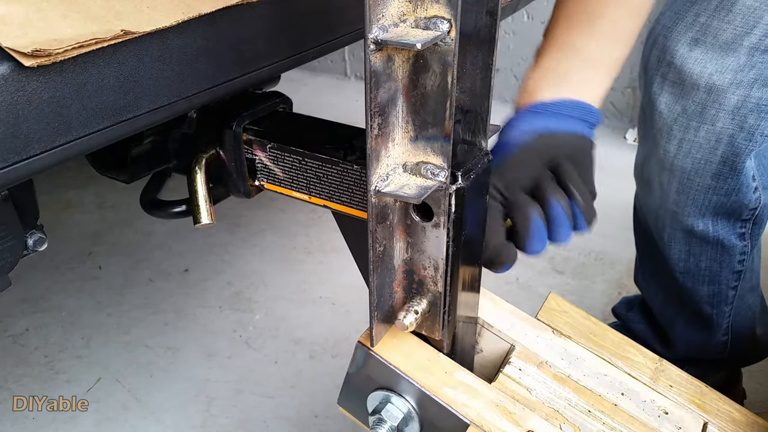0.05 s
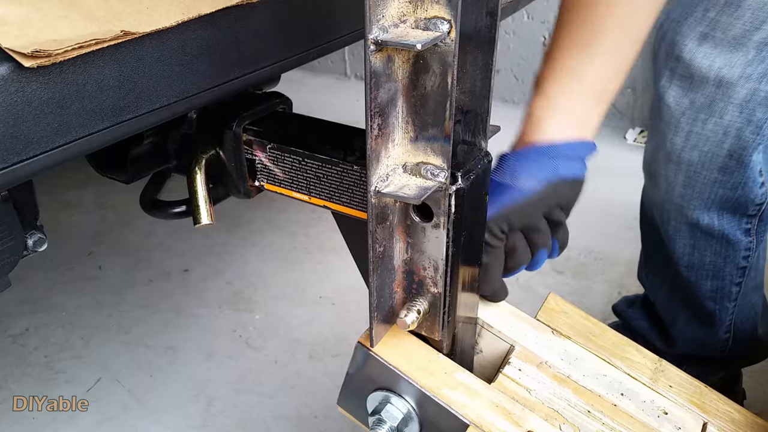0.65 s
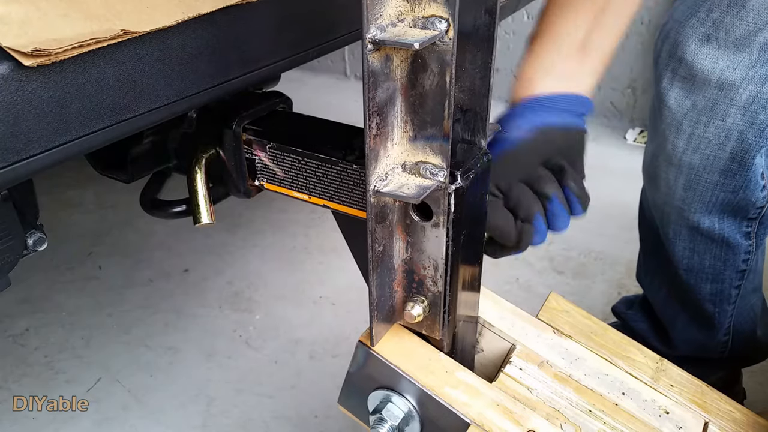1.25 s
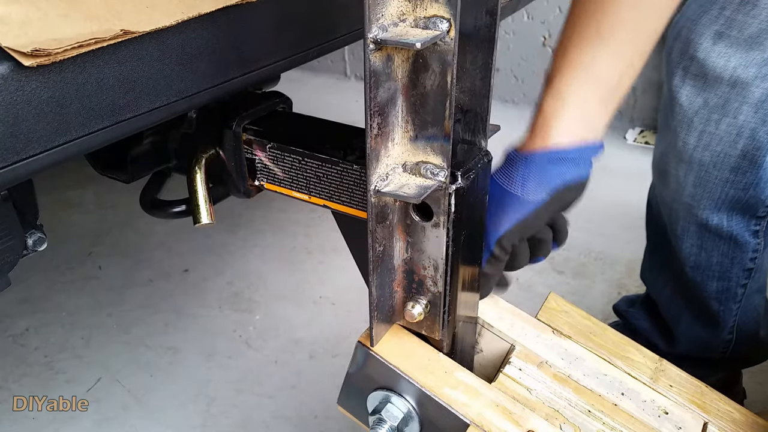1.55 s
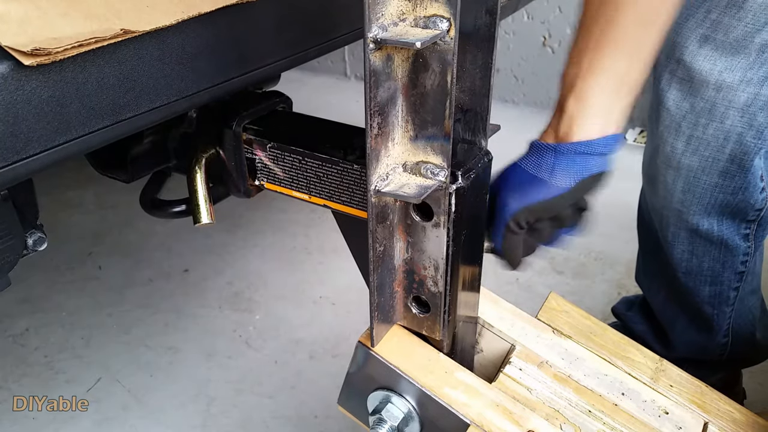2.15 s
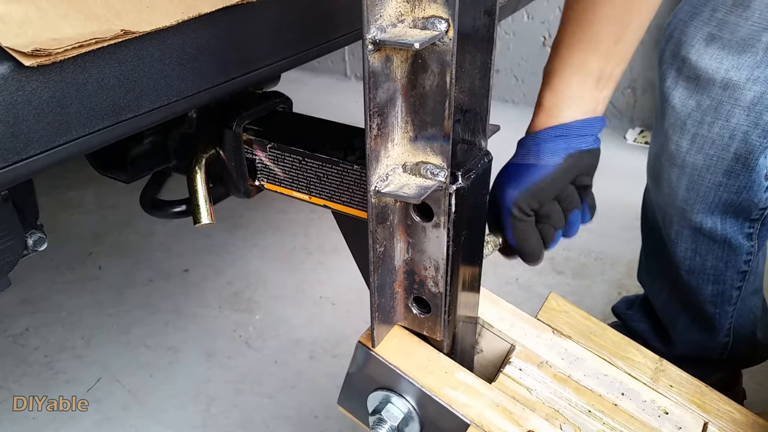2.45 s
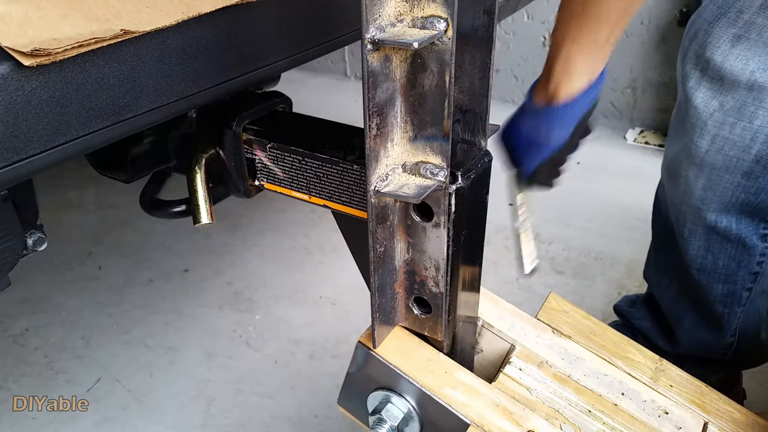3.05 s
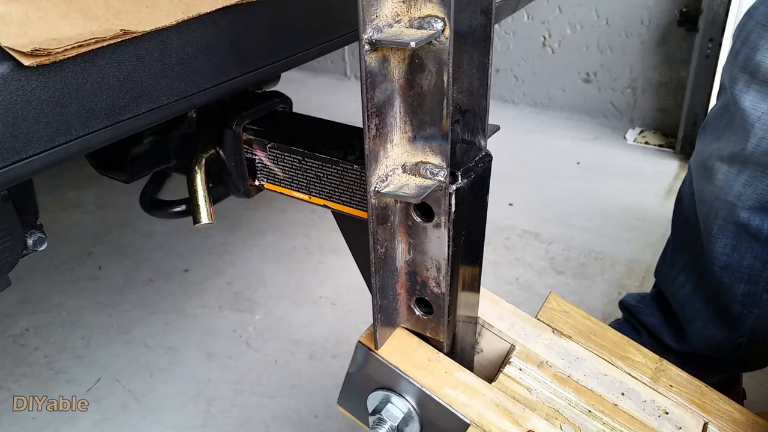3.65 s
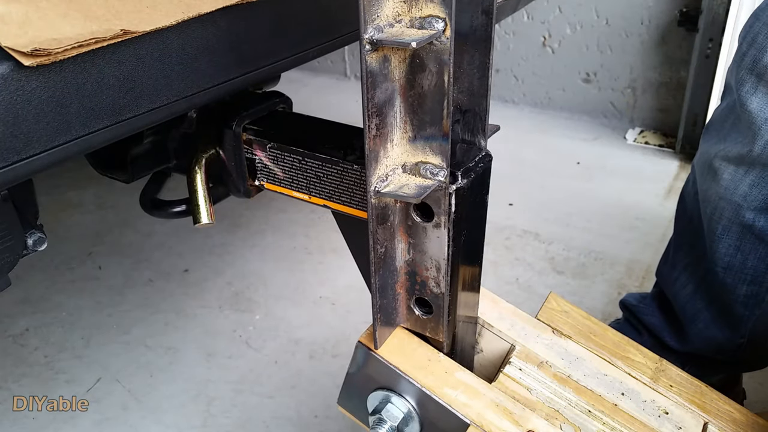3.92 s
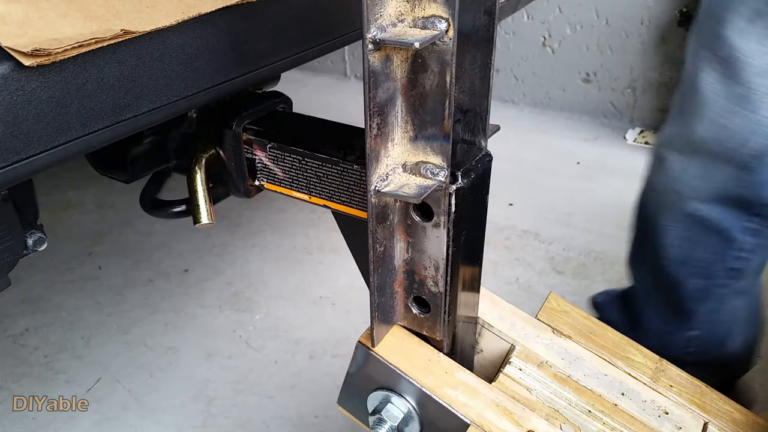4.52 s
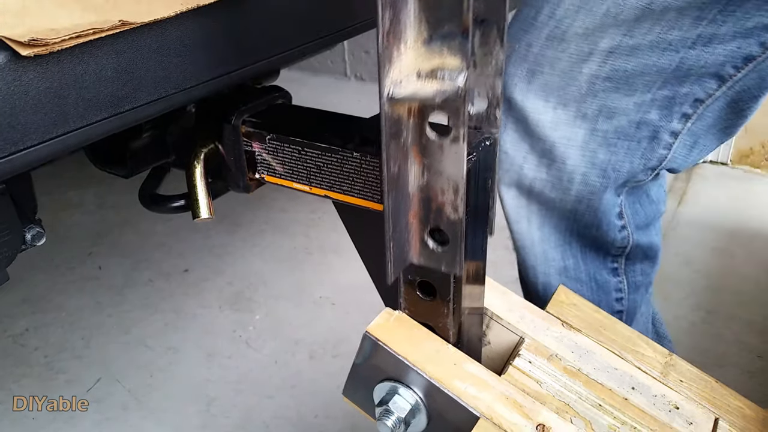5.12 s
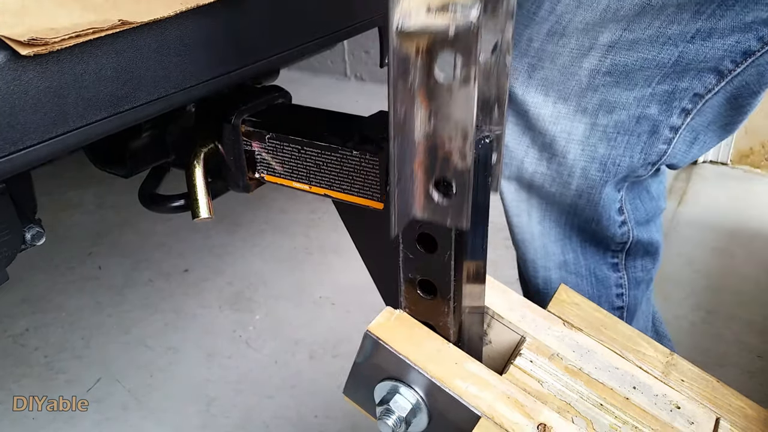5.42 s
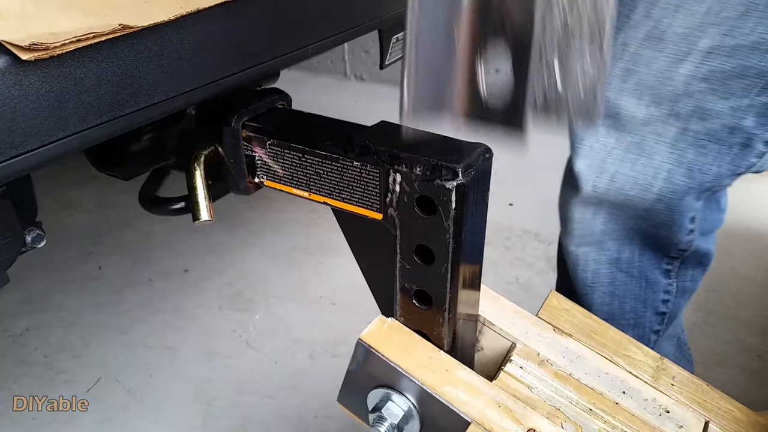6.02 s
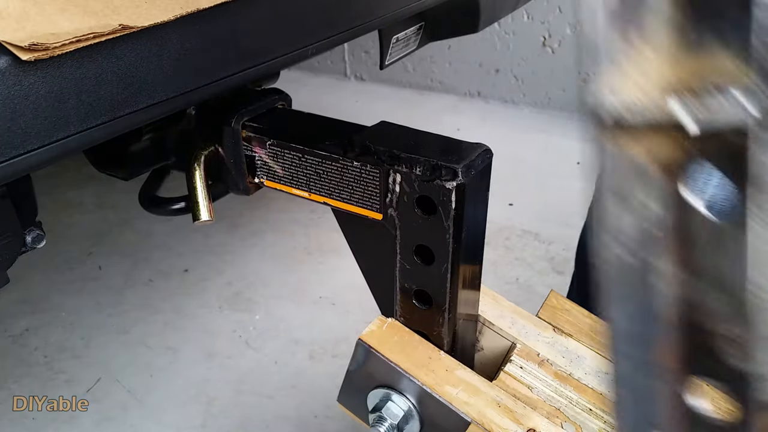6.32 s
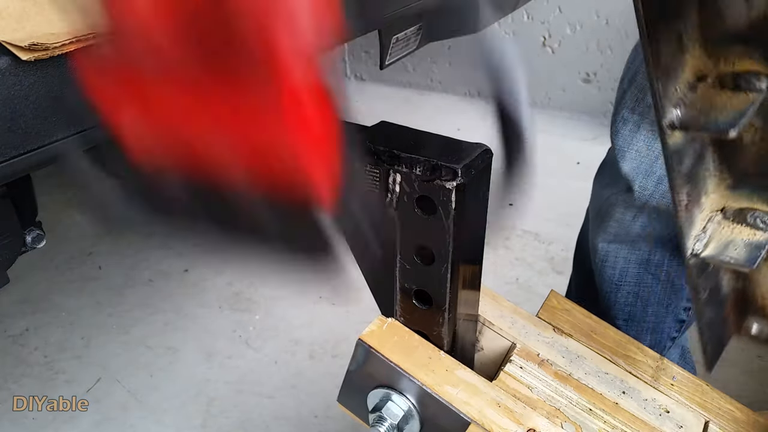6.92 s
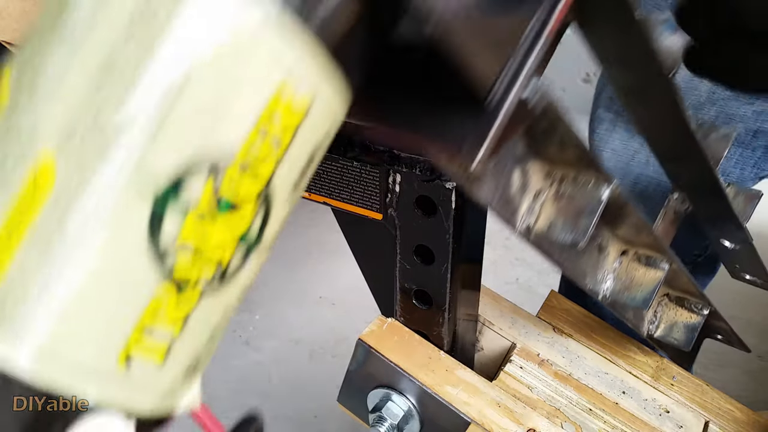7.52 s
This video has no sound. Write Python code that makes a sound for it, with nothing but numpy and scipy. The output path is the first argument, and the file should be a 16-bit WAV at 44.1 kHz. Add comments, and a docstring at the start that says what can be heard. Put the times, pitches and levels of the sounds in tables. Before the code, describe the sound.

Close up in a quiet garage, gloves and denim rustle faintly as a steel pin grinds and knocks in a mount, the knocks growing louder. The freed pin hits the concrete floor, bouncing with a high, ringing clink. Three tugs scrape a steel tube along its post, ending in a loud clatter of clanks and thumps with a short ring. A few light metal clinks follow as the tube is carried off.

```python
"""Garage, low room noise, rustling cloth. 0-3.1 s: a gloved hand works a steel pin out of a square tube
on a hitch mount; the pin slips and knocks in its hole, the mount thumps. 4.1-4.8 s: the dropped pin
bounces on concrete, its bending modes ring, a touch chokes them. 5.0-5.6 s: three tugs scrape the tube
up its post, stick-slip. 5.6 s: its mouth clanks over the post top; one wall mode rings on.
From 7 s: a loose steel part clinks on the tube as it is carried off."""
import sys
import numpy as np
from scipy import signal
from scipy.fft import rfft, irfft, next_fast_len
from scipy.io import wavfile
from scipy.ndimage import uniform_filter1d

SR = 44100
rng = np.random.default_rng(int(sys.argv[2]) if len(sys.argv) > 2 else 0)


def wrap_up_sound(samples):
    """Save the sound to the file named by the first command line argument, as 16-bit audio."""
    columns = np.atleast_2d(samples).T
    # keep every value between -1 and 1, then stretch to whole-number steps
    tamed = np.clip(columns, -1, 1)
    steps = np.round(tamed * 32767).astype(np.int16)
    wavfile.write(sys.argv[1], SR, steps)


N = 342678
TIME_S = np.arange(N) / SR
AGE_S = TIME_S[:SR]  # since a blow, 1 s long

# hand on pin, then on tube: t/s, hold/s, level/dB
HAND_GRIPS = [(0.0, 3.37, 0.5), (4.8, 3.6, 3)]
# glove and denim strokes: t/s, hold/s, level/dB
CLOTH_STROKES = [(0.0, 0.069, -51.5), (0.135, 0.021, -53.5), (0.625, 0.13, -62.5), (1.49, 0.086, -62.5),
                 (1.675, 0.016, -52), (3.374, 0.024, -60.5), (3.481, 0.26, -73), (6.015, 0.095, -53.5),
                 (6.17, 0.07, -60.5), (6.89, 0.15, -45.5), (7.17, 0.058, -55), (7.56, 0.32, -62.5)]
# pin slips in its hole: t/s, level/dB
PIN_SLIPS = [(0.068, -44.5), (0.137, -34.5), (1.094, -40.5), (1.798, -43), (1.984, -40.5), (2.148, -28.5),
             (2.239, -42.5), (2.736, -30.5), (3.068, -31.5)]
# pin or tube hits mount: t/s, clank/dB, thump/dB, treble/dB (edges bright, flat faces dull)
MOUNT_KNOCKS = [(0.211, -44, -41.5, -1), (0.943, -43, -44, -13), (1.085, -31.5, -47, 2.5),
                (1.153, -33, -38, -9.5), (1.314, -39, -41.5, 3), (1.425, -39, -49, -5.5),
                (1.872, -35, -40.5, -7.5), (1.933, -36.5, -35, 5.5), (2.049, -32.5, -29.5, -2),
                (2.09, -32, -32, 4.5), (2.303, -29.5, -25.5, 0), (2.477, -28.5, -42, 3.5),
                (2.5, -17.5, -24, -0.5), (2.515, -16.5, -26.5, -1), (2.878, -15.5, -24, 0),
                (3.109, -16.5, -39, 0.5), (4.735, -36, -32, -5), (4.793, -45, -36, 5.5),
                (4.855, -45, -30, 4.5), (5.122, -38.5, -34, 2), (5.272, -18, -22, -23),
                (5.454, -32.5, -20.5, -9), (6.169, -35, -46, -1), (7.563, -42, -32.5, 8)]
# pin hits floor: t/s, thud/dB, ring/dB, favoured f/Hz, its boost/dB
PIN_BOUNCES = [(4.064, -25, -33.5, 4000, 5.5), (4.257, -31, -43, 6740, 24.5), (4.356, -27.5, -32, 7900, 12),
               (4.46, -38.5, -48, 10900, 16)]
# tube drawn up post: t/s, hold/s, speed/dB, side pressure/dB
TUBE_TUGS = [(5.019, 0.054, -0.5, -1.5), (5.246, 0.012, -12, -5), (5.437, 0.155, -7, -6)]
# tube end hits post: t/s, clank/dB, thump/dB, favoured f/Hz
TUBE_CLANKS = [(5.594, -11, -20, 1860), (5.616, -12.5, -28, 1260), (5.63, -11, -14, 1780),
               (5.655, -44, -11.5, 1660), (5.677, -39, -9.5, 980), (5.699, -17, -20, 1510),
               (5.722, -26.5, -24, 1200), (5.744, -51, -19.5, 1900)]
# loose steel taps: t/s, ring/dB, tick/dB, tick centre f/Hz
STEEL_CLINKS = [(3.62, -80, -54, 12500), (6.953, -67, -45.5, 8140), (6.976, -69, -46, 8200),
                (7.03, -47, -32.5, 2960), (7.293, -45, -57, 4000), (7.307, -29.5, -24.5, 7460),
                (7.312, -50, -30, 1700), (7.501, -57, -51.5, 2900), (7.555, -61.5, -53, 4500)]

# modes of mount, tube and carried steel: f/Hz, level/dB, base t60/s
SWAY_MODES = [(57, -6.5, 0.21), (82.45, -6.5, 0.55), (105.4, -1, 0.35), (134.1, -0.5, 0.22),
              (178.7, -2, 0.19), (210, -10, 0.24), (260.8, -12.5, 0.28)]
MOUNT_MODES = [(357, 2.5, 0.25), (438.5, -9, 0.37), (529, 5, 0.19), (648, 2, 0.13), (710, -1.5, 0.22),
               (806.4, 2.5, 0.17), (1050, -10.5, 0.13), (1310, -30, 0.14), (1633, -1, 0.071),
               (1700, -15, 0.25), (1940, -9.5, 0.15), (2125, -2.5, 0.043), (2565, -6, 0.15),
               (3080, -16, 0.11), (3174, -15.5, 0.16), (3400, -11, 0.085), (3470, -10, 0.089)]
TUBE_MODES = [(795, -4, .35), (940, -9, .3), (1305, -3, .22), (1752, 2, .2), (1836, -4, .24),
              (1925, -5, .18), (2844, -7, .55), (3235, -14, .4), (4484, -14, .35), (5674, -20, .3),
              (6418, -13, .55), (7960, -17, .25), (8248, -13, .3), (10780, -14, .25)]
CARRIED_MODES = [(950, -13, .15), (1888, -17, .35), (2062, -12, .16), (2265, 2, .29), (2320, -11, .7),
                 (3074, -23, .3), (3682, -12, .33), (3994, -21, .25), (4242, -17, .36), (5798, -15, .2),
                 (6024, -21, .3), (6940, -16, .18), (9049, -24, .25), (11180, -13, .12)]
# pin bending modes: f/Hz
PIN_BENDING_HZ = [2766, 4421, 6674, 7563, 11138, 13560, 15680]
# per bending mode: level/dB, free t60/s, beat f/Hz, pan left/dB, lobe peak t/s, gain once fallen/dB
PIN_MODES = [(-1.5, 4.6, 9.07, 6, 4.18, -6.5), (6, 2.5, 14, 5.5, 4.21, -1), (-8, 1.4, 16.76, 6, 3.8, -3),
             (-1.5, 1.2, 19, 13, 3.9, 0), (1.5, 0.75, 34, -4, 5.6, 2.5), (-4.5, 3.7, 27, 0.5, 3.8, -25),
             (-6.5, 1.6, 39, 1, 4.37, -4.5)]
# decay of dense steel modes: f/Hz, base t60/s
DENSE_DECAY = [(100, 0.81), (400, 0.58), (800, 0.34), (2000, 0.19), (4000, 0.21), (8000, 0.12),
               (15000, 0.21)]

# noise spectra: f/Hz, level/dB
AIR_SPECTRUM = [(150, -34.5), (300, 2.5), (600, 0), (950, 5.5), (1500, -4), (2500, -17), (5000, -47),
                (15000, -40)]
RUMBLE_SPECTRUM = [(20, -20), (42, -1.5), (70, -3), (103, 6), (140, -4), (185, -7.5), (280, -16.5),
                   (600, -53)]
CLOTH_SPECTRUM = [(900, -14), (2000, -1), (4000, -7), (5600, -9), (7500, 1), (9500, -5), (12500, 1),
                  (15800, 0)]
CLANK_SPECTRUM = [(120, -3.5), (250, 4), (600, 2), (950, -2.5), (1800, -9.5), (2600, -14.5), (3450, -21),
                  (4200, -38)]
CRACK_SPECTRUM = [(1500, -12.5), (3300, -7), (4300, 5.5), (6000, -10), (7500, 14), (9200, -9), (11500, 3),
                  (15500, -21.5)]
THUD_SPECTRUM = [(90, -23), (200, 11), (500, 3.5), (1100, 6.5), (1700, -3), (4000, -9.5), (12000, -26.5)]
GRIT_SPECTRUM = [(1800, -27), (3400, 4.5), (5500, -5), (7900, 5.5), (9500, -7), (11000, 5), (13000, 3),
                 (15800, -7)]
JUDDER_SPECTRUM = [(20, -15), (42, -7), (60, -5.5), (80, -2.5), (103, 3.5), (140, -7.5), (185, -8),
                   (280, -20), (400, -11.5), (700, -54)]
TUBE_SPECTRUM = [(120, -11), (300, 1), (750, 1), (1050, -3.5), (1800, -11.5), (2400, -16.5), (3300, -18),
                 (4500, -45.5)]


def amp(db):
    """dB to gain."""
    return 10 ** (np.asarray(db) / 20)


def at_hz(hz, points):
    """Table lookup, log-frequency axis."""
    f, value = np.transpose(points)
    return np.interp(np.log(hz + 1), np.log(f), value)


def fade(t, t60_s):
    """Exponential decay, 60 dB in t60_s."""
    return np.exp(-np.log(1000) * t / t60_s)


def unit(x, size=None):
    """Scale to rms 1, overall or over the first size samples."""
    return x / np.sqrt(np.mean(x[..., :size] ** 2) + 1e-18)


def pan(x, left_db):
    """Stereo, left minus right = left_db."""
    return x * amp([[left_db / 2], [-left_db / 2]])


def add(out, at_s, x):
    """Mix x into out."""
    i = int(at_s * SR)
    out[:, i:i + x.shape[1]] += x[:, :N - i]


def stroke(at_s, hold_s, rise_db_per_s, fall_db_per_s):
    """Arm movement envelope: rise until at_s, hold, fall."""
    early_s, late_s = np.maximum(at_s - TIME_S, 0), np.maximum(TIME_S - at_s - hold_s, 0)
    return amp(-rise_db_per_s * early_s - fall_db_per_s * late_s)


def drift(rate_hz):
    """Random values joined by lines."""
    return np.interp(TIME_S * rate_hz, np.arange(200), rng.standard_normal(200))


def handling():
    """Hand activity envelope."""
    return sum(amp(db) * stroke(at_s, hold_s, 148, 27) for at_s, hold_s, db in HAND_GRIPS)


def noise(spectrum, size=SR, alike_hz=900):
    """Coloured stereo noise, sides most alike in the bass."""
    n = next_fast_len(size)
    hz = np.arange(n // 2 + 1) * SR / n
    mid, side = rfft(rng.standard_normal((2, n)))
    side = side * (hz + 0.11 * alike_hz) / (hz + alike_hz)
    bins = np.array([mid + side, mid - side]) * amp(at_hz(hz, spectrum))
    return unit(irfft(bins, n)[:, :size])


def ring(modes, stretch=1, scatter_db=2):
    """Damped modes, reweighted per blow; stereo phase spread grows with pitch."""
    out = np.zeros((2, SR))
    for (hz, db, t60_s), (weight, lag, sign) in zip(modes, rng.standard_normal((len(modes), 3))):
        t = AGE_S[:int(SR * t60_s * stretch)]
        phase = np.array([[1], [-1]]) * lag * min(0.18 + hz / 2500, 1)
        gain = np.sign(sign) * amp(db + scatter_db * weight)
        out[:, :len(t)] += gain * fade(t, t60_s * stretch) * np.sin(2 * np.pi * hz * t + phase)
    return unit(out, size=1300)


def dense_modes(spectrum, stretch=1, direct_db=5, direct_t60_s=0.025):
    """Unresolved modes as noise: direct burst, then a tail whose bass lasts longest."""
    hz, t, bins = signal.stft(noise(spectrum, size=SR * 2 // 3), SR, nperseg=256)
    tail = fade(t, stretch * at_hz(hz, DENSE_DECAY)[:, None])
    burst = amp(direct_db) * fade(t, direct_t60_s)
    x = signal.istft(bins * (tail + burst), SR)[1]
    return unit(np.pad(x, ((0, 0), (0, SR - x.shape[1]))), size=1300)


def stick_slip(size, spread_db):
    """Force of dense, uneven micro-contacts."""
    contacts = rng.standard_normal(size)
    force_db = spread_db * np.repeat(rng.standard_normal(size // 40 + 1), 40)[:size]
    return unit(contacts * amp(force_db))


def drive(force, response):
    """Convolve force with a unit-energy response."""
    response = response / np.sqrt(np.sum(response ** 2) / 2)
    return signal.fftconvolve(np.atleast_2d(force), response, axes=1)[:, :force.shape[-1]]


def chatter(response, t60_s, share_db):
    """Loose steel: one blow, then a dying run of small contacts."""
    force = stick_slip(SR, 3.25) * fade(AGE_S, t60_s)
    force = amp(share_db) * force / np.sqrt(np.sum(force ** 2))
    force[0] += 1
    return unit(drive(force, response), size=1300)


def brighten(x, db, from_hz=900, to_hz=3000):
    """Treble shelf: shorter contact, more treble."""
    n = 2 * x.shape[1]
    hz = np.arange(n // 2 + 1) * SR / n
    shelf = amp(at_hz(hz, [(from_hz, 0), (to_hz, db)]))
    return irfft(rfft(x, n) * shelf, n)[:, :x.shape[1]]


def room(rise_at_s=4.75, rise_s=1.22, rise_db=9):
    """Room noise rises during the lift and stays up; rumble grows with handling."""
    air_db = -61 + rise_db * np.clip((TIME_S - rise_at_s) / rise_s, 0, 1)
    rumble_gain = np.hypot(amp(-56), amp(-50) * handling())
    return pan(noise(AIR_SPECTRUM, N) * amp(air_db), 1) + noise(RUMBLE_SPECTRUM, N) * rumble_gain


def cloth():
    """Glove and denim brush unevenly on each move, stir faintly between."""
    brushes = sum(amp(db) * stroke(at_s, hold_s, 293, 193) for at_s, hold_s, db in CLOTH_STROKES)
    fidget = handling() * amp(-77 + 4 * drift(rate_hz=9))
    level = np.hypot(brushes, fidget) * amp(2 + 3.8 * drift(rate_hz=24))
    fibres = drive(stick_slip(N, 3.5), dense_modes(CLOTH_SPECTRUM, direct_db=10, direct_t60_s=0.0081))
    return pan(fibres * level, 1.3)


def garage(x, wet_db=-17, t60_s=0.67, onset_s=0.0025):
    """Concrete walls add a faint, dull tail."""
    tail = noise([(100, 0.5), (400, -3), (2500, 0), (7000, -4), (15000, -14.5)], alike_hz=200)
    return x + amp(wet_db) * drive(x, tail * fade(AGE_S, t60_s) * (1 - np.exp(-AGE_S / onset_s)))


def steel_clinks(tick_t60_s=0.062):
    """Small steel taps: tick plus ring."""
    out = np.zeros((2, N))
    for at_s, ring_db, tick_db, hz in STEEL_CLINKS:
        spectrum = [(hz / 6, -25), (hz / 2, -4), (hz, 0), (hz * 2, -10), (hz * 4, -28)]
        tick = noise(spectrum) * fade(AGE_S, tick_t60_s)
        steel = ring(CARRIED_MODES, stretch=1.15, scatter_db=1)
        add(out, at_s, amp(ring_db - 1) * steel + amp(tick_db) * tick)
    return pan(out, 4.2)


def mount_thump(onset_s=0.0062):
    """Mount sways on its hitch; bass builds late."""
    return unit(ring(SWAY_MODES, scatter_db=3.5) * (1 - np.exp(-AGE_S / onset_s)), size=2000)


def pin_slips(slip_s=0.0369):
    """Pin grinds briefly along its hole, shaking the mount."""
    out = np.zeros((2, N))
    arch = np.sqrt(np.sin(np.pi * np.minimum(AGE_S / slip_s, 1)) + 1e-12)
    for at_s, db in PIN_SLIPS:
        force = stick_slip(SR, 0.73) * arch
        mount = dense_modes(CLANK_SPECTRUM) + amp(-4) * ring(MOUNT_MODES)
        clank = unit(drive(force, mount), size=1800)
        crack = unit(drive(force, dense_modes(CRACK_SPECTRUM, direct_db=15)), size=1800)
        add(out, at_s, pan(amp(db - 7) * clank + amp(db - 18) * crack, 5.3))
        add(out, at_s + slip_s / 3, amp(db - 1) * mount_thump())
    return out


def mount_knocks(chatter_t60_s=0.036, bite_s=0.0018, stretch=0.76):
    """Pin or tube bangs across its play: crack, clank, thump."""
    out = np.zeros((2, N))
    bite = 1 - np.exp(-AGE_S / bite_s)  # rounded pin, soft onset
    for at_s, clank_db, thump_db, treble_db in MOUNT_KNOCKS:
        clank = chatter(dense_modes(CLANK_SPECTRUM, stretch, direct_db=3.5), chatter_t60_s, share_db=2.5)
        clank += amp(-2) * ring(MOUNT_MODES, stretch)
        crack = chatter(dense_modes(CRACK_SPECTRUM, stretch, direct_db=-7), chatter_t60_s, share_db=-5)
        blow = bite * amp(clank_db) * brighten(amp(-9) * clank + amp(-29) * crack, treble_db)
        add(out, at_s, pan(blow, 5) + amp(thump_db - 1) * mount_thump())
    return out


def floor_thuds():
    """Pin hits concrete: short thud, weak tail."""
    out = np.zeros((2, N))
    envelope = fade(AGE_S, 0.05) + amp(-18.5) * fade(AGE_S, 0.67)
    for at_s, thud_db, *_ in PIN_BOUNCES:
        add(out, at_s, amp(thud_db) * noise(THUD_SPECTRUM) * envelope)
    return pan(out, 2)


def bounce_envelope(t, hz, t60_s, focus_oct=0.18, onset_s=0.008):
    """Bounces feed energy to one pin mode; the contact point picks the favoured pitch."""
    energy = 0
    for at_s, _, ring_db, favoured_hz, boost_db in PIN_BOUNCES:
        nearness = np.exp(-(np.log2(hz / favoured_hz) / focus_oct) ** 2)
        age_s = np.maximum(t - at_s, 0)
        decay = fade(age_s, t60_s) * (1 - np.exp(-age_s / onset_s))
        energy += (amp(ring_db + boost_db * nearness) * decay) ** 2
    return np.sqrt(energy)


def bending_tone(hz, beat_hz, beat_depth=0.35, flutter_depth=0.19):
    """Round bar: two detuned bending planes beat; skitter on rough floor adds flutter."""
    plane_a, plane_b = np.exp(2j * np.pi * rng.random((2, 2, 1)))
    real, imag = unit(uniform_filter1d(uniform_filter1d(rng.standard_normal((2, 2, SR)), 260), 90))
    fluttering = plane_a * (1 + flutter_depth * (real + 1j * imag))
    detuned = beat_depth * plane_b * np.exp(2j * np.pi * beat_hz * AGE_S)
    return ((fluttering + detuned) * np.exp(2j * np.pi * hz * AGE_S)).imag


def pin_ring(spin_hz=4.35, tip_at_s=4.345, tip_s=0.018, rest_at_s=4.47, choke_at_s=4.793):
    """Dropped pin spins, tips over, decays faster lying flat; a touch chokes it."""
    tone = np.zeros((2, N))
    start_s = PIN_BOUNCES[0][0]
    t = start_s + AGE_S
    fallen = np.clip((t - tip_at_s) / tip_s, 0, 1)
    resting = fade(np.maximum(t - rest_at_s, 0), t60_s=0.73)
    for hz, (db, t60_s, beat_hz, left_db, peak_s, fallen_db) in zip(PIN_BENDING_HZ, PIN_MODES):
        lobe_db = 3.5 * np.cos(2 * np.pi * spin_hz * (t - peak_s))  # lobes sweep past the listener
        level = amp(db + lobe_db + fallen_db * fallen) * resting * bounce_envelope(t, hz, t60_s)
        add(tone, start_s, pan(level * bending_tone(hz, beat_hz), left_db))
    echoes = rng.standard_normal((2, SR)) * fade(AGE_S, t60_s=0.45)
    choke = fade(np.maximum(TIME_S - choke_at_s, 0), t60_s=0.04)
    return choke * (tone + amp(-6) * drive(tone, echoes))


def tube_scrape(wall_exponent=0.76, judder_exponent=0.6):
    """Tube catches and slips on post: grit hisses with speed; pressure rings walls, judders mount."""
    grit_gain = wall_gain = judder_gain = 0
    for at_s, hold_s, speed_db, pressure_db in TUBE_TUGS:
        speed = amp(speed_db) * stroke(at_s, hold_s, 341.5, 307.5)
        grit_gain = np.maximum(grit_gain, speed)
        wall_gain = np.maximum(wall_gain, amp(pressure_db) * speed ** wall_exponent)
        judder_gain = np.maximum(judder_gain, amp(pressure_db) * speed ** judder_exponent)
    catches = amp(2.5 * unit(uniform_filter1d(rng.standard_normal(N), 300)))
    walls = dense_modes(TUBE_SPECTRUM, direct_db=14)
    walls += amp(-6) * ring(TUBE_MODES, stretch=0.1) + amp(-9.5) * ring(MOUNT_MODES, stretch=0.34)
    grit_force = stick_slip(N, 1.7) * catches
    hiss = grit_gain * drive(grit_force, dense_modes(GRIT_SPECTRUM, direct_db=28, direct_t60_s=0.14))
    rub = wall_gain * drive(stick_slip(N, 4.54) * catches, walls)
    judder = judder_gain * noise(JUDDER_SPECTRUM, N)
    return pan(amp(-32) * hiss, 2.9) + pan(amp(-25.5) * rub, 6.2) + pan(amp(-15.5) * judder, 0.95)


def tube_ring(start_s=5.745, hz=2972, onset_s=0.096, t60_s=0.52):
    """Clear of the post, one wall mode rings."""
    t = np.maximum(TIME_S - start_s, 0)
    envelope = amp(-26) * (1 - np.exp(-t / onset_s)) * fade(t, t60_s)
    return pan(envelope * np.sin(2 * np.pi * hz * t), 2.8)


def tube_clanks(clear_at_s=5.63, crack_fall_db_per_s=379, stretch=0.78):
    """Tube mouth rattles over the post top; blows lose their crack as it clears."""
    out = np.zeros((2, N))
    for at_s, clank_db, thump_db, hz in TUBE_CLANKS:
        steel = amp(-14) * dense_modes(TUBE_SPECTRUM, stretch, direct_db=-26)
        steel += amp(-15) * ring(TUBE_MODES, stretch)
        # struck wall rings hardest until the post damps it
        wall = noise([(hz / 2, -28), (hz, 0), (hz * 2.15, -28)]) * fade(AGE_S, t60_s=0.073)
        steel += amp(-9) * unit(wall, size=1300)
        crack_db = -26 - crack_fall_db_per_s * max(at_s - clear_at_s, 0)
        crack = chatter(dense_modes(GRIT_SPECTRUM, stretch, direct_db=-13.5), t60_s=0.077, share_db=12)
        blow = pan(amp(clank_db) * steel, 4.8) + pan(amp(crack_db) * crack, 7.2)
        add(out, at_s, blow + amp(thump_db - 4) * mount_thump())
    return out


def scene():
    """Steelwork with wall echo, dropped pin, cloth, room."""
    steel = mount_knocks() + pin_slips() + tube_scrape() + tube_clanks() + tube_ring() + steel_clinks()
    return garage(steel) + floor_thuds() + pin_ring() + cloth() + room()


def record(dry):
    """Soft peak limit, 16 kHz low-pass."""
    limited = dry / (1 + (dry / 0.85) ** 4) ** 0.25
    return signal.sosfilt(signal.ellip(10, 0.2, 80, 16000, fs=SR, output="sos"), limited)


dry = scene()
out = record(dry)
wrap_up_sound(out)
```